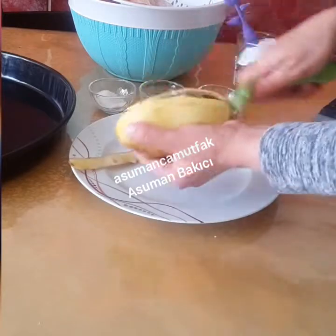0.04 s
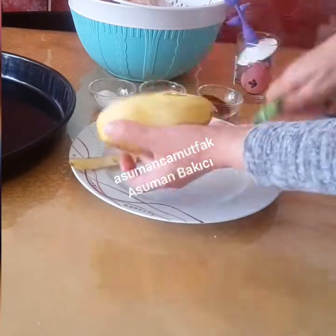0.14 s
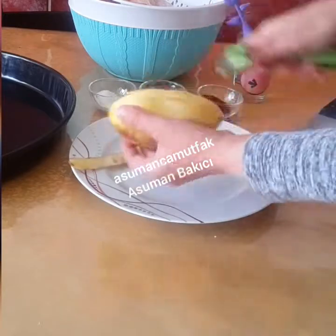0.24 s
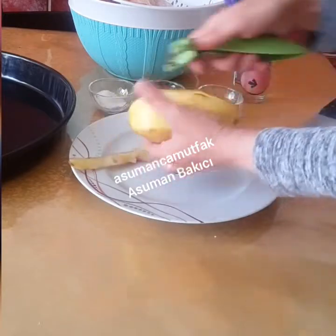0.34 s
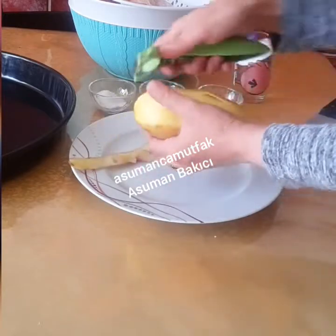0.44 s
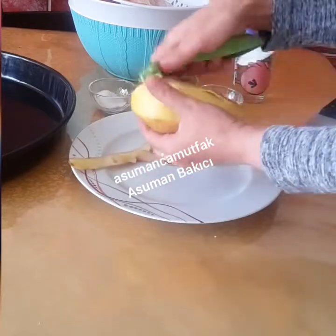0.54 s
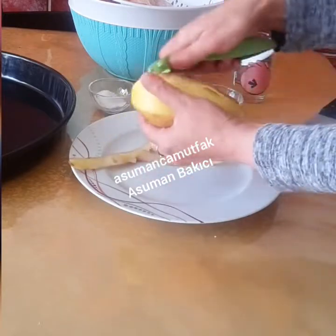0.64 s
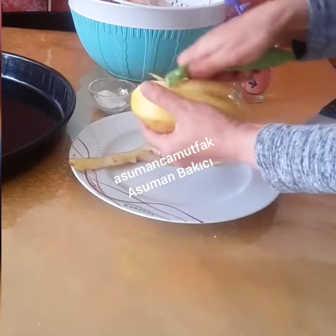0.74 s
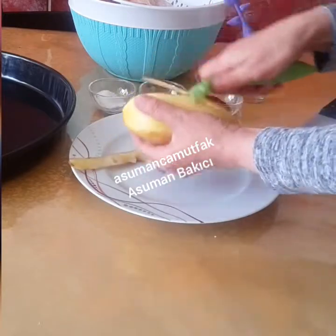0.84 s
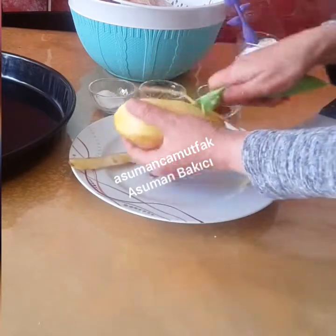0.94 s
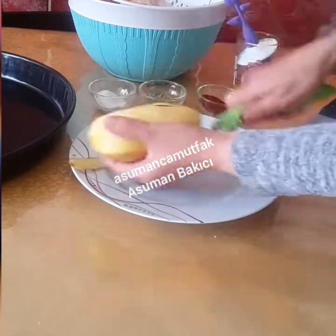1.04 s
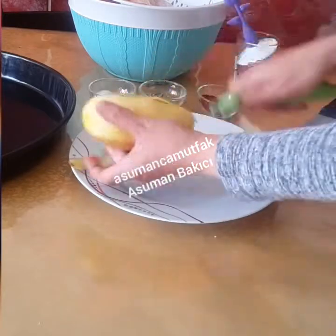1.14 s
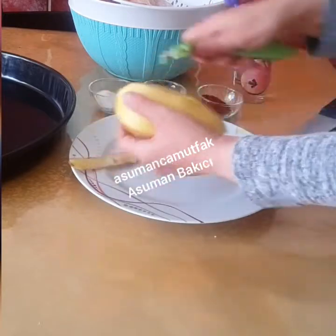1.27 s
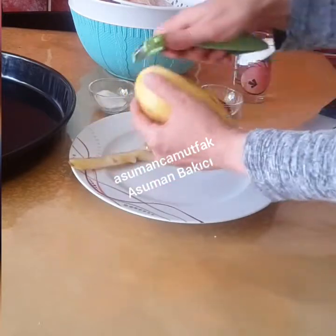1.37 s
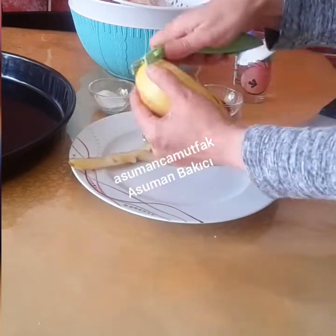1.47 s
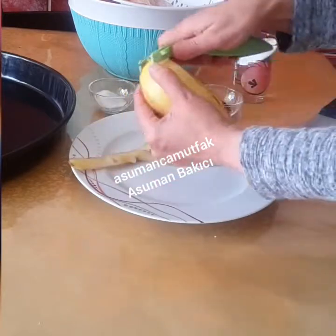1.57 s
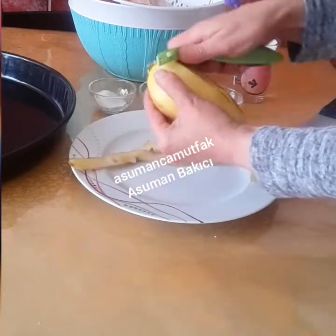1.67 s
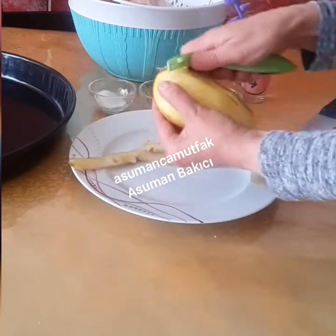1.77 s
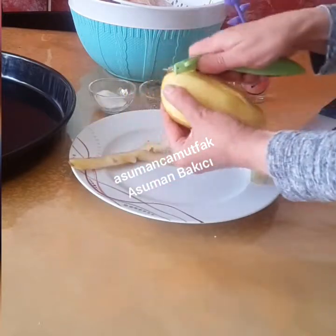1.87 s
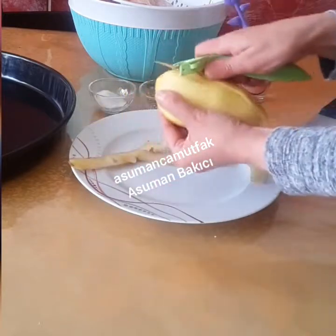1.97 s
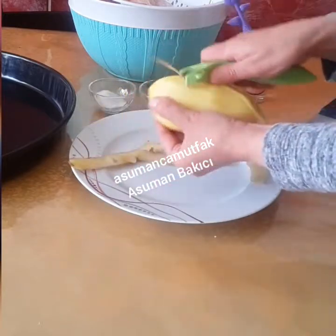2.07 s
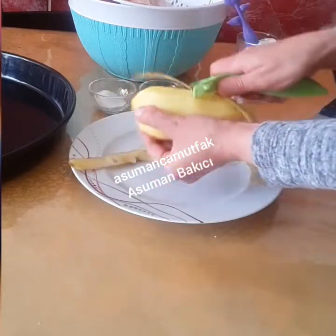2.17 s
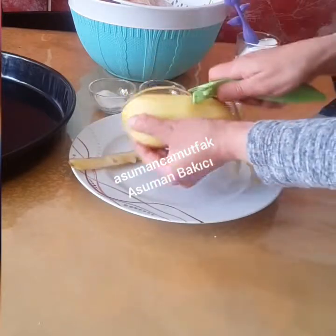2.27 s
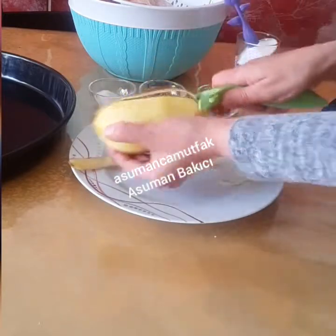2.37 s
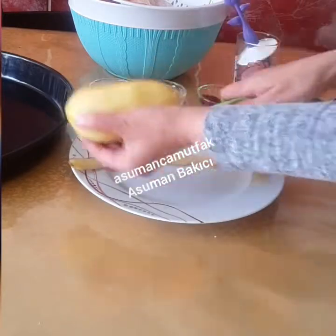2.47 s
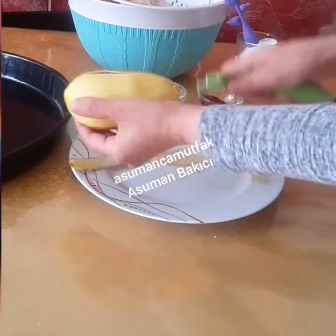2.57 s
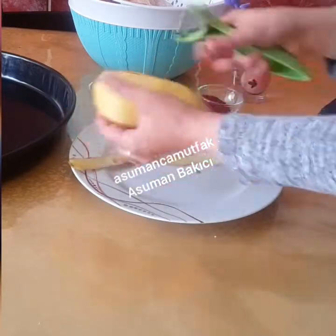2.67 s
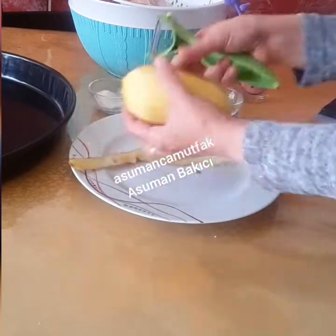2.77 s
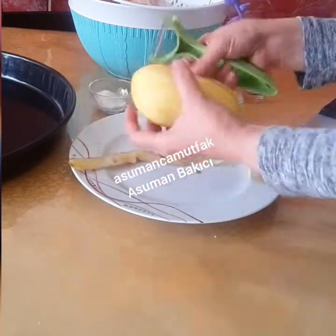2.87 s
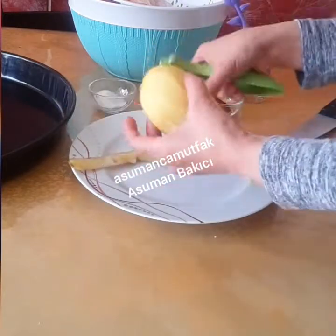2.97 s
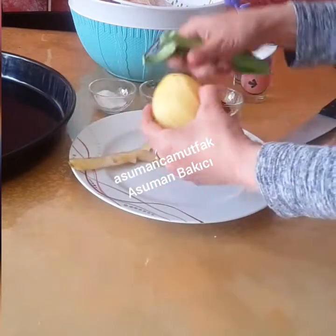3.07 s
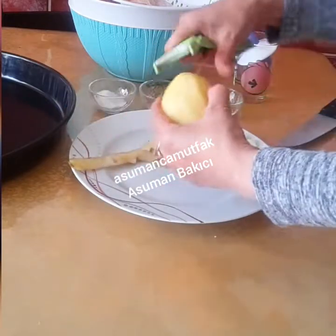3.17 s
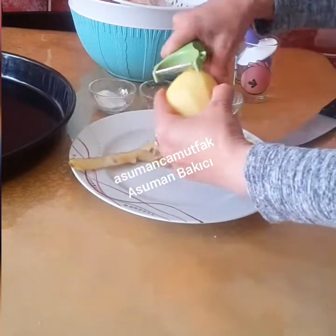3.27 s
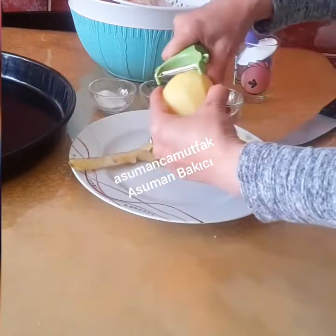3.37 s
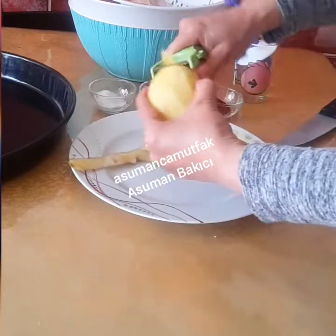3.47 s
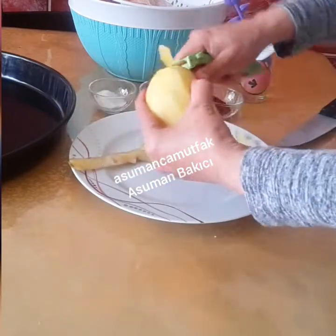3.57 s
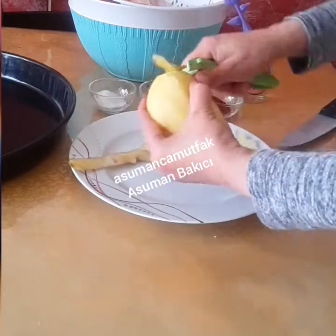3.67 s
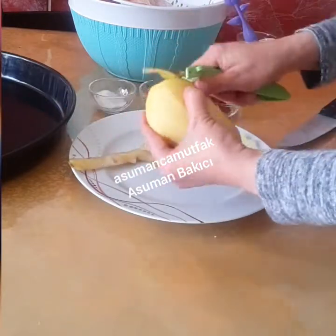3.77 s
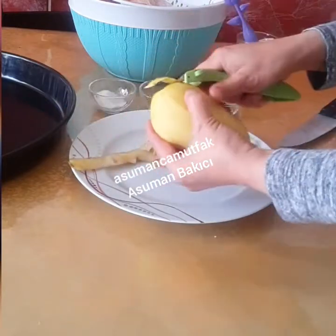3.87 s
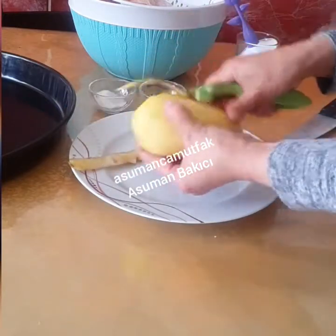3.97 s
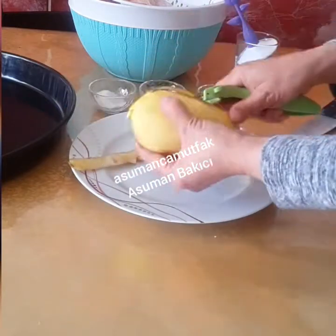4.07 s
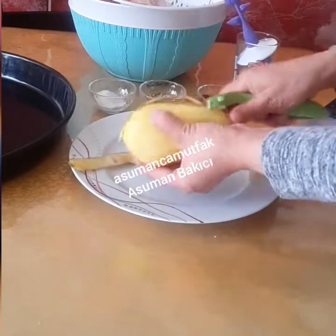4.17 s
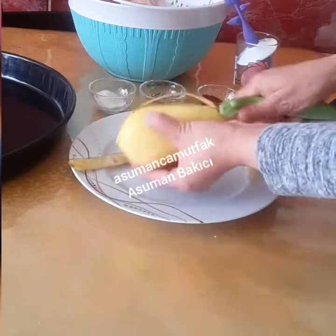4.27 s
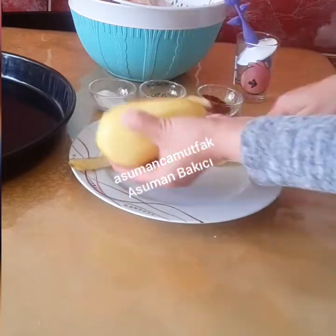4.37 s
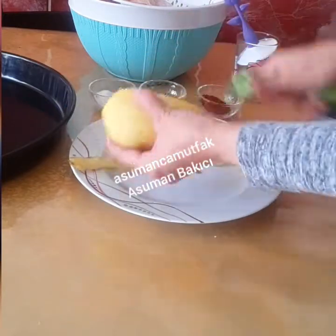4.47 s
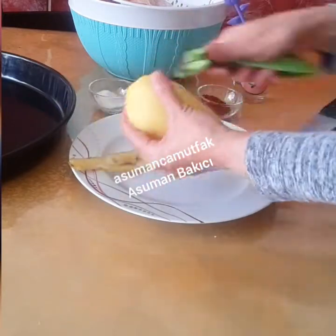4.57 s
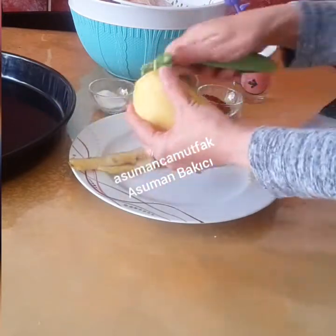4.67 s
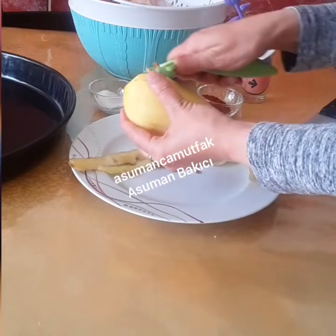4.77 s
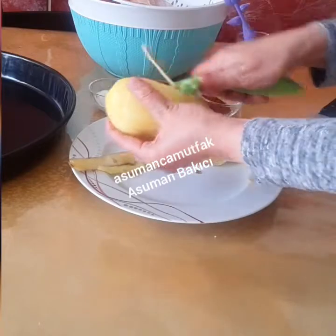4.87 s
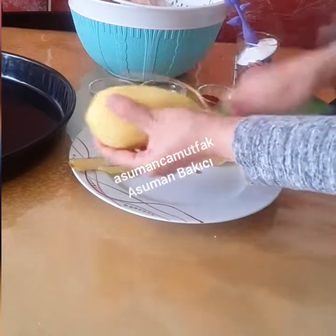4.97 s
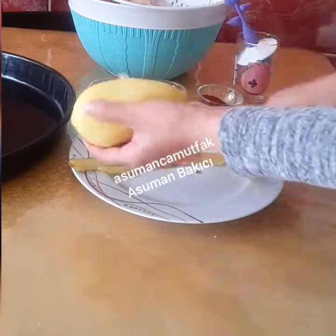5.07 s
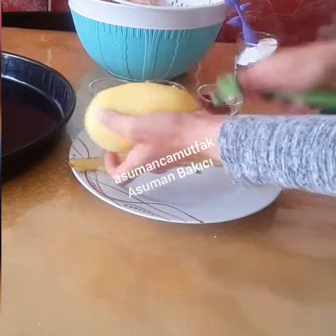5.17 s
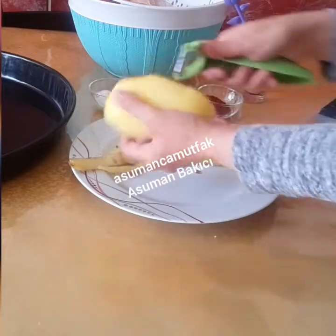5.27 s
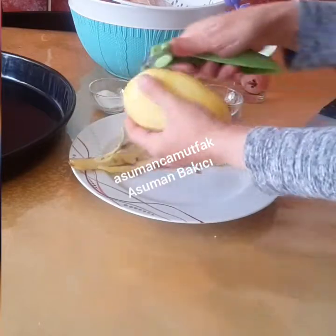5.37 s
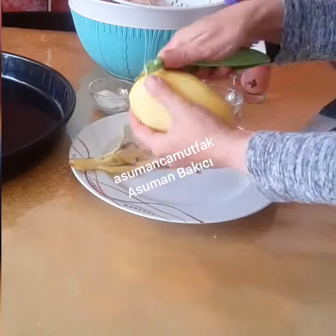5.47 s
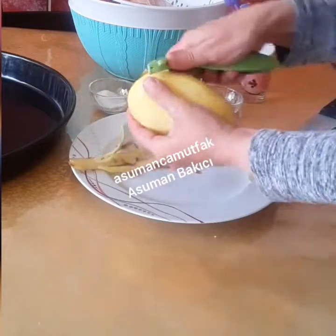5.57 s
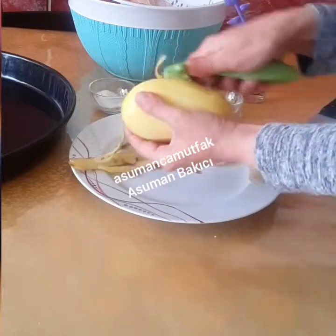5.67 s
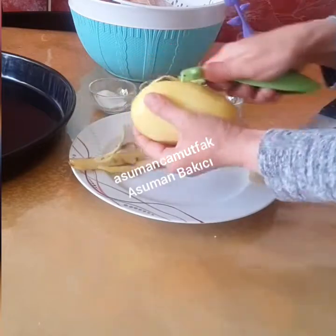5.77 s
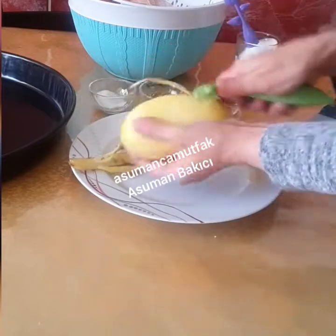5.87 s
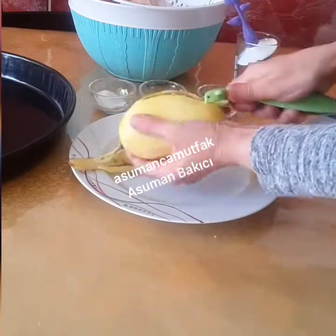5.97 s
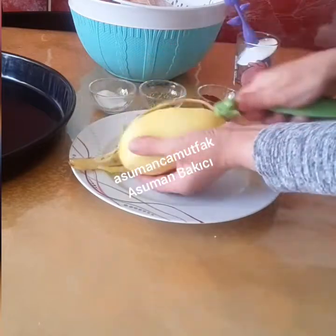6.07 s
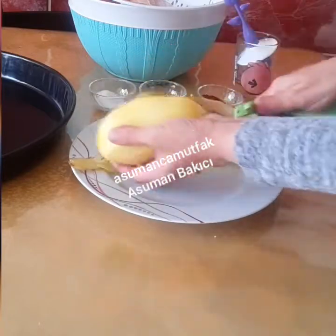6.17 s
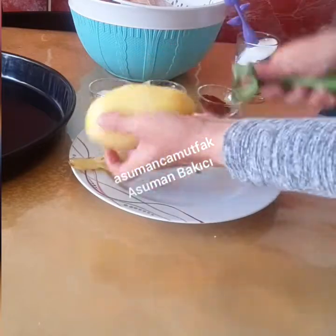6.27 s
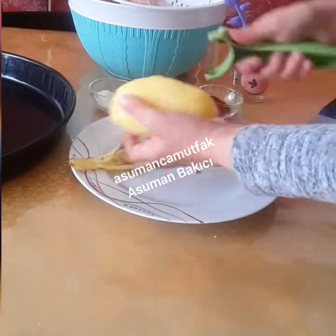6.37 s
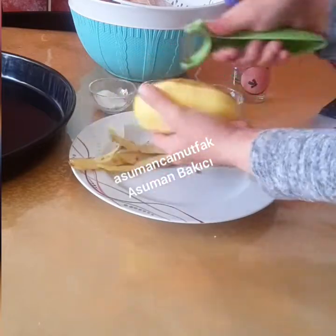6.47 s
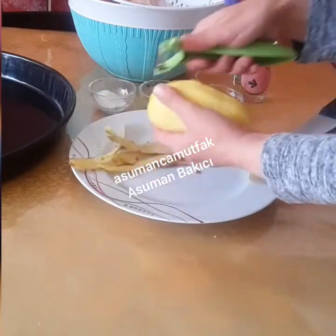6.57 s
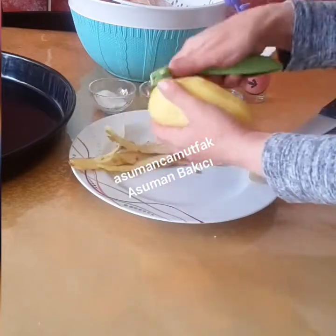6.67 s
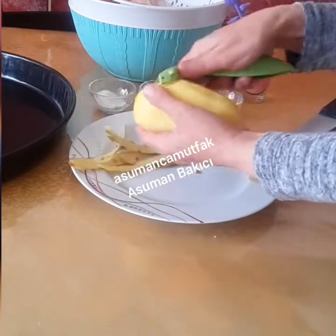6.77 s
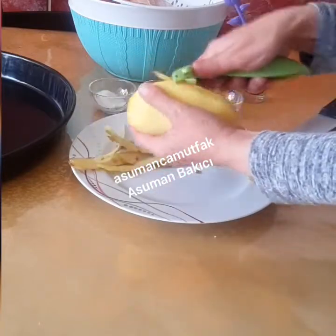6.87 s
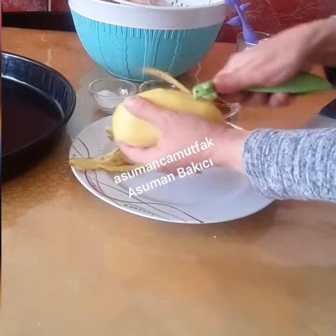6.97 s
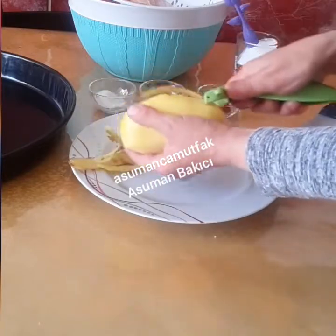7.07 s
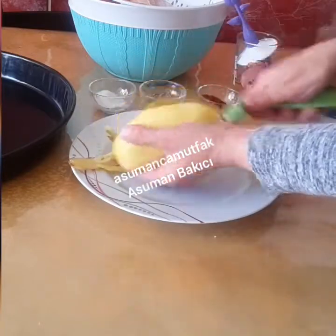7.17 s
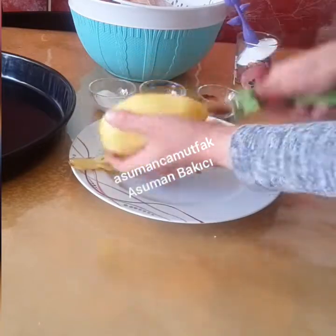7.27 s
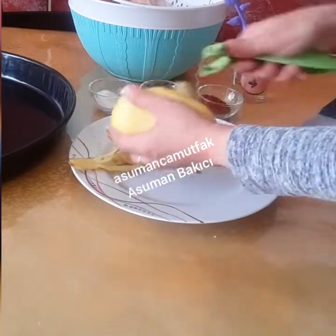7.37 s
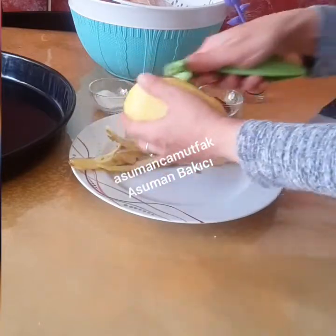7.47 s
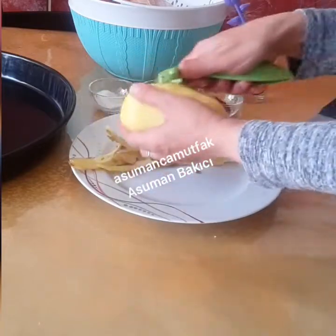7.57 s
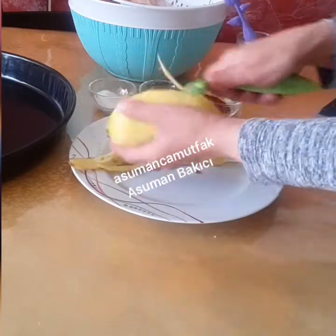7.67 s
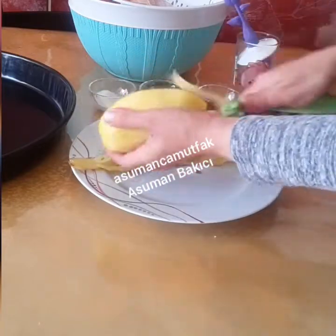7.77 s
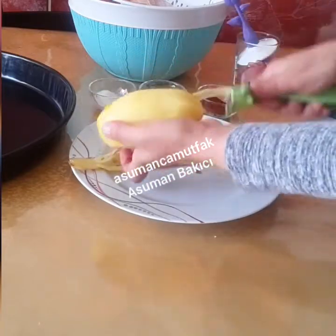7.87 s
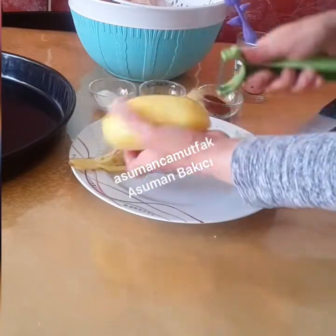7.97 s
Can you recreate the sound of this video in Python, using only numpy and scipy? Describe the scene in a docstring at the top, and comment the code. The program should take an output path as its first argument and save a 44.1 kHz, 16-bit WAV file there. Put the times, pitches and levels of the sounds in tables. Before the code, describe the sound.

Short bright scrapes of a swivel peeler on a potato, with rattly metallic clicks, one clear china clink near the end and a faint low hum.

```python
"""Repeated short pulls of a swivel peeler rasp through raw potato skin over a faint appliance hum and room noise.
Each of the strokes is a random crackle of bursting wet cells that excites the resonance of blade and frame.
Around the strokes the loose blade clacks and taps as damped noise bursts; grips tick and the pivot squeaks.
A china plate is clinked twice and a glass bowl once, and a hand bumps the table: sums of decaying modes.
Random echoes of the small kitchen surround the sounds, which reach two microphone ports."""
import sys
import numpy as np
from scipy import signal
from scipy.fft import rfft, irfft, next_fast_len
from scipy.io import wavfile

SR = 44100
rng = np.random.default_rng(int(sys.argv[2]) if len(sys.argv) > 2 else 0)


def unload_wav(signal):
    """Save mono or channel-first audio to the path in sys.argv[1] as 16-bit WAV at rate SR, clipped to [-1, 1]."""
    wavfile.write(
        sys.argv[1],
        SR,
        np.round(np.clip(np.atleast_2d(signal).T, -1, 1) * 32767).astype(np.int16),
    )


N = 353682  # length in samples

# Levels in dB are relative: gains in scene() scale whole layers.
# Appliance hum. Each row: mean frequency in Hz, relative level in dB.
HUM = [(122, -73), (183, -75.5), (258.6, -72), (388, -70), (420.5, -68.5)]
# Spectrum of room noise and hiss. Each row: frequency in Hz, relative level in dB.
FLOOR = [(25, -3), (60, -6.5), (130, -7), (220, 2), (320, -11.5), (410, -3.5), (520, -7.5), (1200, -10.5),
         (2000, -18), (6300, -14.5), (7400, -6.5), (8800, -13.5), (10000, -17.5), (14500, -23.5)]
FLOOR_DB = -59.5  # rms level of the noise
# Stereo width of the noise. Each row: frequency in Hz, gain of the channel difference in dB.
FLOOR_SIDE = [(30, -3.5), (100, -13.5), (300, -5.5), (700, 0), (3000, -1), (14000, -3)]

# Decay of the room. Each row: frequency in Hz, t60 in seconds.
ROOM = [(150, 0.96), (600, 0.86), (1500, 0.45), (3500, 0.37), (8000, 0.32), (14000, 0.24)]
# Stereo width of all but the background. Each row: frequency in Hz, gain of the channel difference in dB.
CASE_SIDE = [(100, -3), (400, -0.5), (900, 1.5), (6600, 0), (7300, -17), (9200, -12), (11000, -4)]
# Response of the left port. Each row: frequency in Hz, gain in dB.
LEFT_PORT = [(100, -0.5), (1000, -6), (2000, 1), (6300, -2.5), (7000, 3.5), (7400, 5.5), (8100, 3),
             (9000, 0.5), (10500, -2), (12500, 2)]
# Response of the right port. Each row: frequency in Hz, gain in dB.
RIGHT_PORT = [(100, -1), (1000, -4.5), (2000, 2), (6300, -3.5), (7400, -0.5), (8300, 3), (9000, 2.5),
              (10500, 0.5), (12500, 1)]
EDGE_HZ = 14750  # upper band limit

# Modes of the table. Each row: frequency in Hz, relative level in dB, t60 in seconds.
TABLE = [(80.5, -2, .14), (121.6, -0.5, .35), (182.6, 2, 0.21), (261, -1, 0.27), (384, -7.5, 0.29),
         (644, -18, 0.35)]
# Bumps on the table. Each row: time in seconds, relative level in dB.
TABLE_BLOWS = [(3.075, -51), (6.152, -42), (6.177, -45.5), (6.235, -50)]
# Modes of the glass bowl. Each row: frequency in Hz, relative level in dB, t60 in seconds.
GLASS = [(1820, 2, .27), (1885, -4, .16), (2770, -11, .25), (4150, -10, .2)]
# Clink of the glass bowl. Each row: time in seconds, relative level in dB.
GLASS_BLOWS = [(3.075, -47.5)]
# Modes of the china plate. Each row: frequency in Hz, relative level in dB, t60 in seconds.
PLATE = [(604, -20, .5), (1212, -5.5, .75), (1813, -8, .42), (2406, -8, .65), (3020, -8.5, .6),
         (3664, -3, .42), (4386, -3.5, .26), (5185, -4.5, .3), (6074, -3, .3), (7050, -.5, .34),
         (8086, -5.5, .42), (9222, -12, .3)]
# Clinks of the plate. Each row: time in seconds, relative level in dB.
PLATE_BLOWS = [(1.266, -53), (7.531, -36)]
# Spectrum of the click of a blow. Each row: frequency in Hz, gain in dB.
KNOCK_COLOUR = [(100, -21), (400, 9.5), (1500, 14.5), (4000, -11), (8000, -15), (14000, -15)]
# Modes of the bare steel blade. Each row: frequency in Hz, relative level in dB, t60 in seconds.
BLADE = [(10930, 0.5, 0.024), (10200, -7.5, 0.18)]
# Ping of the blade. Each row: time in seconds, relative level in dB.
BLADE_BLOWS = [(0.5033, -37.5)]
# A weak twin beside each mode makes it beat: level in dB, largest relative frequency offset.
TWIN_DB, TWIN_SPLIT = -9, 0.0041

# New grips on the wet potato. Each row: start in seconds, length in seconds, relative level in dB.
GRIPS = [(0.449, 0.63, -55), (1.099, .28, -64), (2.719, .28, -54.5), (3.064, 0.2, -54),
         (3.329, 0.13, -55.5), (3.52, 0.22, -53), (4.497, 0.66, -70.5), (5.329, 0.72, -59),
         (6.201, 0.26, -61.5), (6.657, .4, -57)]
# A grip is firmest at this share of its length, and this much weaker at its ends.
GRIP_PEAK, GRIP_EDGE_DB = 0.44, -12.5
# Squeaks of the pivot. Each row: start in seconds, length in seconds, relative level in dB, starting pitch in Hz.
SQUEAKS = [(0.39, 0.048, -56.5, 3170), (2.746, 0.068, -54, 3016), (2.874, .055, -51, 2880)]
SQUEAK_FADE_DB, SQUEAK_SAG_HZ_PER_S = -10, 1000  # each squeak dies away and sinks a little

# The blade swings and taps its stop. Each row: time in seconds, relative level in dB.
TAPS = [(0.5452, -37.5), (4.647, -47.5), (4.744, -45), (4.8057, -34.5), (5.357, -43.5), (5.368, -47),
        (5.473, -40.5), (6.411, -43.5), (6.4743, -40.5), (6.593, -38), (6.639, -36.5), (6.718, -42)]
TAP_HZ, TAP_DEEP_DB = 2530, -3.5  # every tap has the same note
# The blade clacks in its frame as it meets or leaves the potato.
# Each row: time in seconds, relative level in dB, ring in Hz, low-frequency share of the power in dB.
CLACKS = [(.1617, -16, 8900, -12), (.168, -20.5, 8700, -5.5), (.393, -36, 3140, -2),
          (0.399, -29, 8450, -10), (.639, -22.5, 3080, -2), (.643, -17.5, 8300, -5.5),
          (1.319, -35, 3220, -4), (1.414, -39.5, 8800, -25), (1.551, -17, 9600, -15.5),
          (1.568, -25, 7400, -8), (2.512, -16.5, 8260, -14), (2.5209, -23.5, 5960, -8.5),
          (2.79, -35.5, 7000, -6), (2.823, -26, 7900, -22), (2.877, -24, 7600, -16.5),
          (3.0612, -26, 4260, -14), (3.168, -33.5, 7400, -7), (3.239, -29, 3780, -3.5),
          (3.358, -48, 3230, -1), (3.3818, -36, 3020, -0.5), (3.397, -36, 3740, 5), (4.2, -32, 7000, -11),
          (4.877, -24, 7700, -6), (5.02, -15.5, 7500, -23), (5.5545, -24, 8000, -6),
          (5.5605, -19, 8300, -19), (5.7102, -26, 7700, -15), (6.2362, -17, 7700, -8.5),
          (6.292, -24.5, 7640, -7), (6.8183, -27, 7600, -5.5), (7.507, -25, 7900, -7),
          (7.5307, -20.5, 6880, -19), (7.562, -23, 3050, -4), (7.8372, -17.5, 8000, -16),
          (7.861, -21.5, 7500, -22)]
# Spectrum of clacks, finger ticks and snaps. Each row: frequency in Hz, gain in dB.
CLACK_COLOUR = [(50, -50), (200, -15.5), (900, -15.5), (1900, -16.5), (2600, -4), (4000, -2), (5500, -0.5),
                (7600, 0.5), (10000, -4), (14500, -23.5)]
# Decay time constant of a clack that rings at 3 kHz, and the power by which it changes with pitch.
RATTLE_S, RATTLE_SLOPE = 0.0033, -0.51

# Pulls of the blade. Each row: start, rise, hold and fall in seconds, relative cutting level in dB,
# mid-pull share of the deep rasp in dB, mid-pull resonance of blade and frame in Hz.
STROKES = [ (0.0, 0.00067, 0.082, 0.12, -31.5, -6, 4080), (0.748, 0.021, 0.015, 0.082, -38, -3.5, 4200),
           (0.839, 0.028, .02, 0.21, -32, -4, 4000), (1.0, 0.048, 0.036, 0.078, -33.5, -6, 4150),
           (1.563, 0.0046, 0.0085, 0.043, -30, -7.5, 4400), (1.777, 0.014, 0.064, .02, -47.5, -6, 4230),
           (1.965, .035, 0.031, 0.053, -40.5, -7, 4300), (2.103, 0.029, 0.045, 0.037, -38, -7.5, 3950),
           (2.151, 0.054, 0.016, 0.088, -31.5, -7, 4420), (2.29, 0.1, 0.039, 0.22, -33, -5.5, 4300),
           (2.505, .012, .022, 0.018, -48, -3.5, 4600), (3.492, .048, .025, 0.042, -36.5, -10, 1930),
           (3.729, 0.048, 0.06, 0.035, -44, -9.5, 2000), (4.001, 0.025, 0.038, 0.069, -31, -8.5, 4140),
           (4.189, 0.055, 0.014, 0.077, -32, -6.5, 4280), (4.313, 0.047, 0.012, 0.084, -32, -5.5, 4100),
           (4.801, .01, 0.035, 0.058, -45.5, -2.5, 3870), (4.843, 0.086, 0.1, 0.061, -32.5, -6, 4150),
           (5.546, 0.023, .015, 0.062, -35, -4.5, 3980), (5.696, 0.018, 0.056, 0.054, -33.5, -6.5, 3250),
           (5.889, 0.033, 0.039, 0.079, -31, -6, 3620), (6.085, 0.043, 0.056, 0.066, -34, -5.5, 3700),
           (6.285, .012, .004, 0.014, -35.5, -4, 3700), (6.813, .01, .015, 0.033, -41, -3.5, 3670),
           (6.9, 0.056, .11, .055, -34, -5, 3600), (7.17, .06, .022, .045, -34, -4.5, 3760),
           (7.659, 0.091, 0.036, 0.11, -29, -7, 3550)]
# Spectrum of the cutting rasp. Each row: frequency in Hz, gain in dB.
RASP = [(100, -25), (250, -19.5), (450, -24), (700, -20), (1100, -24.5), (1700, -15.5), (2350, -10),
        (3400, -5.5), (4300, -4.5), (5000, -3.5), (6300, 1.5), (7500, 5), (10000, -2), (14500, -16)]
ENTRY_DB, EXIT_DB = -14.5, -13.5  # cutting level as the blade enters and leaves the skin, against the hold
DULLING_DB = 3.5  # rise of the deep share over a pull
SAG_HZ_PER_S = 580  # the frame's resonance sinks as the pull goes on


def amp(db):
    """Logarithmic scale: decibels to amplitude gain."""
    return 10 ** (np.asarray(db) / 20)


def unit(x):
    """Power normalization: scales to rms 1."""
    return x / np.sqrt(np.mean(abs(x) ** 2) + 1e-20)


def read(points, hz):
    """Interpolation of (Hz, value) points on a log-frequency axis."""
    f, value = np.transpose(points)
    return np.interp(np.log(hz + 1), np.log(f + 1), value)


def add(mix, s, sound):
    """Superposition: adds a two-channel sound to the mix at time s."""
    part = mix[:, max(round(s * SR), 0):][:, :sound.shape[1]]
    part += sound[:, :part.shape[1]]


def colour(x, points):
    """Linear filtering: weights the spectrum by a (Hz, dB) curve."""
    n = x.shape[-1]
    gain = amp(read(points, np.fft.rfftfreq(n, 1 / SR)))
    return irfft(rfft(x) * gain, n)


def drift(n, hz):
    """Low-passed noise: a smooth random course of rms about 1 that moves at up to about hz."""
    size = next_fast_len(n + SR // 4)
    fall = np.exp(-(np.fft.rfftfreq(size, 1 / SR) / hz) ** 2)
    return unit(irfft(rfft(rng.standard_normal(size)) * fall, size))[:n]


def resonate(x, hz, width):
    """Resonance by heterodyning: shifts hz to zero, smooths and shifts back, so hz may vary in time."""
    turn = np.exp(2j * np.pi * np.cumsum(hz * np.ones(len(x))) / SR)
    r = np.exp(-np.pi * width / SR)
    return 2 * (turn * signal.lfilter([1 - r], [1, -r], x / turn)).real


def narrow(pair, side_db):
    """Mid-side stereo: scales the channel difference band by band."""
    mid = pair.mean(0)
    side = colour((pair[0] - pair[1]) / 2, side_db)
    return np.array([mid + side, mid - side])


def crackle(n, per_s, spread_db):
    """Random impulse train: many small snaps of either sign, a few large."""
    size = amp(spread_db * np.minimum(rng.exponential(1, n), 4))
    sign = rng.choice([-1, 1], n)
    return size * sign * (rng.random(n) < per_s / SR)


def deepen(x, deep_db, split_hz=5000):
    """Power sharing: weights the normalized bands below and above split_hz by the stated share."""
    low = signal.sosfiltfilt(signal.butter(4, split_hz, fs=SR, output="sos"), x)
    share = np.clip(amp(deep_db) ** 2, .01, .95)
    return np.sqrt(share) * unit(low) + np.sqrt(1 - share) * unit(x - low)


def background(waver_hz=2.386, flutter_db=3.0):
    """Modulated sinusoids and filtered noise: a wavering appliance hum over soft room noise and hiss."""
    hum = 0
    for hz, db in HUM:
        level = amp(db + flutter_db * drift(N, 22.0))
        phase = 2 * np.pi * np.cumsum(hz + waver_hz * drift(N, 7.0)) / SR
        hum = hum + level * np.sqrt(2) * np.sin(phase)
    air = narrow(colour(rng.standard_normal((2, N)), FLOOR), FLOOR_SIDE)
    return amp(-2.5) * hum + amp(FLOOR_DB) * unit(air)


def kitchen(sounds, wet_db, near_db, near_s=0.0038, gap_s=.006):
    """Reflection and reverberation: random echoes off table and dishes, then a room tail, new for each sound."""
    t = np.arange(SR // 2) / SR
    out = np.zeros((2, N))
    for s, sound in sounds:
        echoes = rng.choice([-1., 1.], (2, len(t))) * (rng.random((2, len(t))) < 4000 / SR)
        # each frequency band of the tail decays by its own t60
        hz, when, z = signal.stft(echoes, SR, nperseg=256)
        decay = amp(-60 * when / read(ROOM, hz)[:, None])
        tail = signal.istft(z * decay, SR, nperseg=256)[1][:, :len(t)] * (t > gap_s)
        near = echoes[:, ::-1] * np.exp(-t / near_s) * (t > .0005)
        # echo energies in dB against the direct sound
        paths = 0
        for db, h in [(wet_db, tail), (near_db, near)]:
            paths = paths + amp(db) * h / np.linalg.norm(h, axis=1, keepdims=True)
        # the direct sound reaches the left port two samples before the right
        paths[[0, 1], [0, 2]] += 1
        add(out, s, signal.fftconvolve(sound[None], paths, axes=1))
    return out


def struck(modes, blows, rise_s, spread):
    """Modal superposition: each blow starts decaying modes, set spread radians apart at the two ports."""
    t = np.arange(SR) / SR
    out = np.zeros((2, N))
    ports = np.array([[-.5], [.5]])
    ring = 0
    for k, (hz, db, t60) in enumerate(modes):
        # the leading port alternates from mode to mode
        turn = 2 * np.pi * hz * t + ports * spread * (-1) ** k
        twin_turn = turn * (1 + TWIN_SPLIT * rng.uniform(0.3, 1)) + 2 * np.pi * rng.random((2, 1))
        twin = amp(TWIN_DB) * np.sin(twin_turn)
        ring = ring + amp(db - 60 * t / t60) * (np.sin(turn) + twin)
    for s, db in blows:
        add(out, s, amp(db) * ring * (1 - np.exp(-t / rise_s)))
    return out


def knock(s, db, contact_s, snap_db, snap_s=0.0009):
    """Impact noise: a hard, wide-band click at the instant of a blow, plus a thin snap."""
    t = np.arange(SR // 50) / SR
    body = unit(colour(rng.standard_normal(len(t)), KNOCK_COLOUR)) * np.exp(-t / contact_s)
    snap = unit(colour(rng.standard_normal(len(t)), CLACK_COLOUR)) * np.exp(-t / snap_s)
    return s, amp(db) * (body + amp(snap_db) * snap)


def handling(start, length, db, ticks_per_s=700):
    """Adhesive friction: sparse sticky ticks of skin and peel under the fingers swell and ease with the grip."""
    n = round(length * SR)
    firmness_db = np.interp(np.arange(n) / n, [0, GRIP_PEAK, 1], [GRIP_EDGE_DB, 0, GRIP_EDGE_DB])
    ticks = unit(colour(crackle(n, ticks_per_s, spread_db=4.5), CLACK_COLOUR))
    return start, amp(db + firmness_db) * ticks


def squeak(start, length, db, pitch_hz, width_hz=170, upper_hz=4900, upper_db=-3):
    """Friction-driven resonance: tiny slips of the wet pivot feed two narrow resonances, the lower one sinking."""
    t = np.arange(0, length, 1 / SR)
    slips = crackle(len(t), per_s=1900, spread_db=6.5)
    lower = resonate(slips, pitch_hz - SQUEAK_SAG_HZ_PER_S * t, width_hz)
    upper = amp(upper_db) * resonate(slips, upper_hz, width_hz)
    fade = amp(db + SQUEAK_FADE_DB * t / length)
    return start, fade * unit(lower + upper) * signal.windows.tukey(len(t), .1)


def clack(s, level_db, ring_hz, deep_db, ring_db=8, width_hz=260, rise_s=0.00038):
    """Damped impact: the blade rattles on its stop and the frame rings briefly; high rings are damped most."""
    t = np.arange(-SR // 200, SR // 25) / SR
    since = np.maximum(t, 0)
    pitch = ring_hz / 3000
    decay_s = RATTLE_S * pitch ** RATTLE_SLOPE
    fade = (1 - np.exp(-since / rise_s)) * np.exp(-since / decay_s)
    rattle = colour(rng.standard_normal(len(t)) * fade, CLACK_COLOUR)
    ring = resonate(rattle, ring_hz, width_hz * pitch ** 2)
    sound = deepen(rattle + amp(ring_db) * ring, deep_db)
    # refer the level to the peak of the envelope, not to its mean
    return s + t[0], amp(level_db) * sound * np.sqrt(np.mean(fade ** 2)) / fade.max()


def stroke(start, rise, hold, fall, db, deep_db, blade_hz,
           cells_per_s=6000, chatter_db=1.06, chatter_hz=200,
           blade_db=3.5, blade_width_hz=450, bite_s=0.0017, lift_s=0.023,
           slips_per_s=80, slip_db=0, slip_s=0.00036):
    """Stick-slip and resonance: the blade catches and slips through flesh; bursting cells ring its frame."""
    length = rise + hold + fall
    t = np.arange(0, length, 1 / SR)
    level_db = db + np.interp(t, [0, rise, rise + hold, length], [ENTRY_DB, 0, 0, EXIT_DB])
    # each slip strengthens the bursts for a moment
    slip_starts = rng.random(len(t)) < slips_per_s / SR
    slips = signal.lfilter([1], [1, -np.exp(-1 / (slip_s * SR))], slip_starts)
    chatter = amp(chatter_db * drift(len(t), chatter_hz))
    cells = crackle(len(t), cells_per_s, spread_db=3.5) * chatter * (1 + amp(slip_db) * slips)
    rasp = colour(cells, RASP)
    # the frame's resonance shifts with the pressure on the blade, drawn as random drift
    frame_hz = (blade_hz - SAG_HZ_PER_S * (t - length / 2)) * (1 + 0.032 * drift(len(t), 23))
    rasp = rasp + amp(blade_db) * resonate(rasp, frame_hz, blade_width_hz)
    contact = np.clip(np.minimum(t / bite_s, (length - t) / lift_s), 0, 1)
    deep_course_db = deep_db + DULLING_DB * (t / length - .5)
    return start, amp(level_db) * contact * deepen(rasp, deep_course_db)


def scene():
    """Superposition of hum, table, dishes and peeler in the kitchen."""
    hum_and_air = background()
    table = struck(TABLE, TABLE_BLOWS, rise_s=0.0059, spread=0.34)

    glass = struck(GLASS, GLASS_BLOWS, rise_s=0.00075, spread=0.97)
    glass_knocks = [knock(*row, contact_s=.0009, snap_db=14, snap_s=.0003) for row in GLASS_BLOWS]
    glass += amp(18) * kitchen(glass_knocks, wet_db=-6, near_db=-14)

    # the plate's ring is weaker at the left port than at the right
    plate = struck(PLATE, PLATE_BLOWS, rise_s=0.00043, spread=0.8) * amp([[-2], [2]])
    plate_knocks = [knock(*row, contact_s=0.00094, snap_db=4) for row in PLATE_BLOWS]
    plate += amp(1.5) * kitchen(plate_knocks, wet_db=-2.0, near_db=6)

    blade = struck(BLADE, BLADE_BLOWS, rise_s=.0003, spread=1)
    grips = [handling(*row) for row in GRIPS]
    squeaks = [squeak(*row) for row in SQUEAKS]
    rubbing = amp(1.5) * kitchen(grips + squeaks, wet_db=3.0, near_db=-4)
    taps = [clack(s, db, TAP_HZ, TAP_DEEP_DB, ring_db=14, width_hz=180) for s, db in TAPS]
    clacks = amp(-5) * kitchen([clack(*row) for row in CLACKS] + taps, wet_db=-3, near_db=-8)
    cutting = amp(-2.5) * kitchen([stroke(*row) for row in STROKES], wet_db=-0.5, near_db=-1)

    peeler = cutting + clacks + rubbing + blade
    return narrow(peeler + plate + glass + table, CASE_SIDE) + hum_and_air


def record(dry):
    """Linear transfer: each microphone port has its own frequency response; then the band limit."""
    ports = np.array([colour(dry[0], LEFT_PORT), colour(dry[1], RIGHT_PORT)])
    low_pass = signal.firwin(301, EDGE_HZ, window=("kaiser", 8), fs=SR)
    return signal.oaconvolve(ports, low_pass[None], "same", axes=1)


dry = scene()
out = record(dry)
unload_wav(out)
```